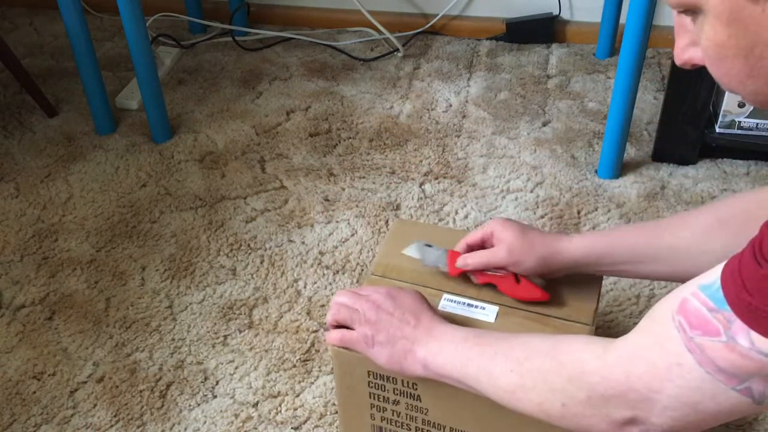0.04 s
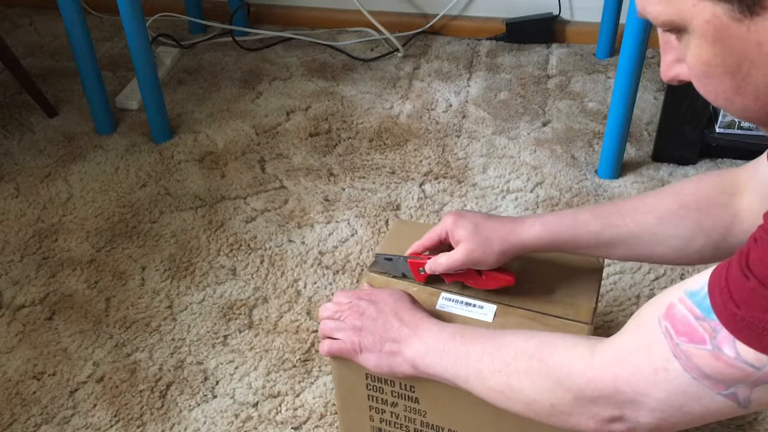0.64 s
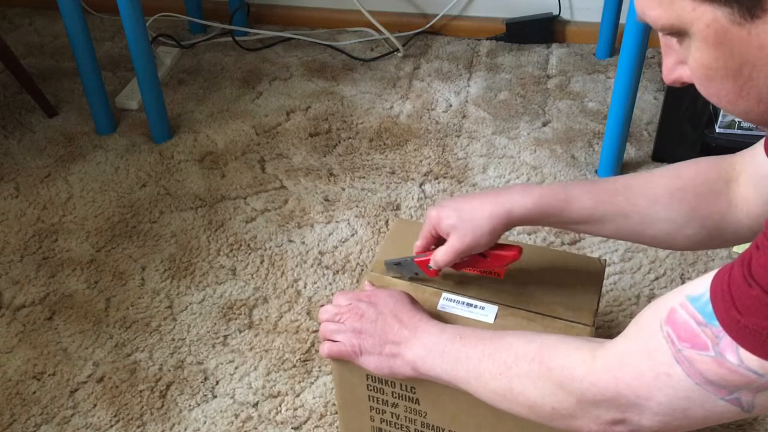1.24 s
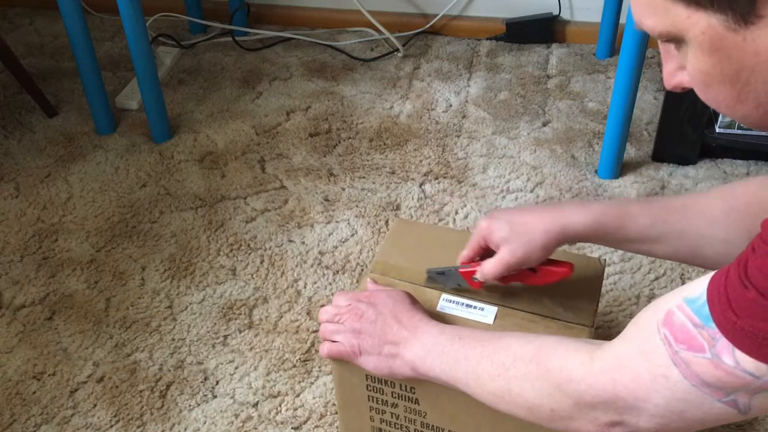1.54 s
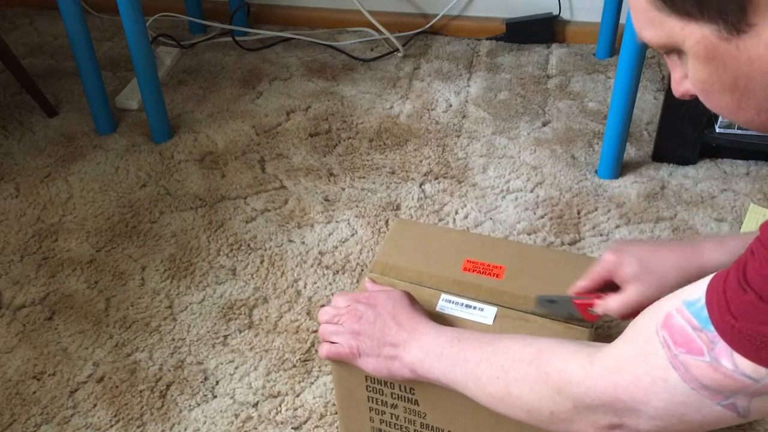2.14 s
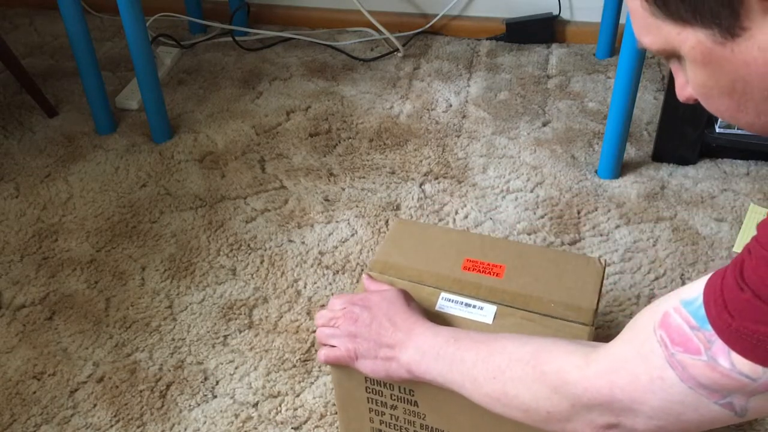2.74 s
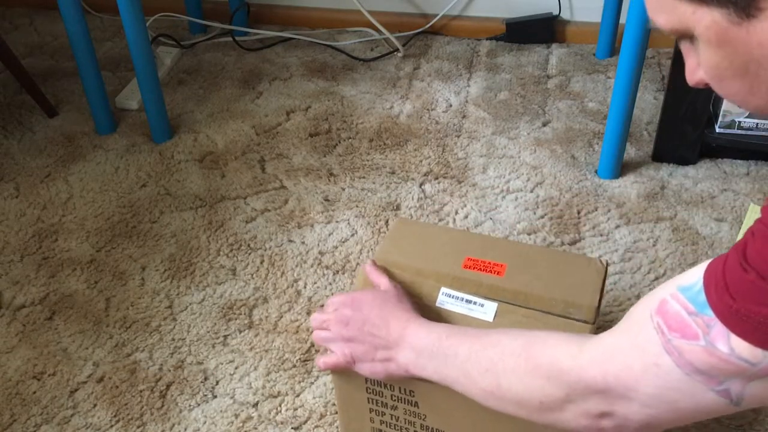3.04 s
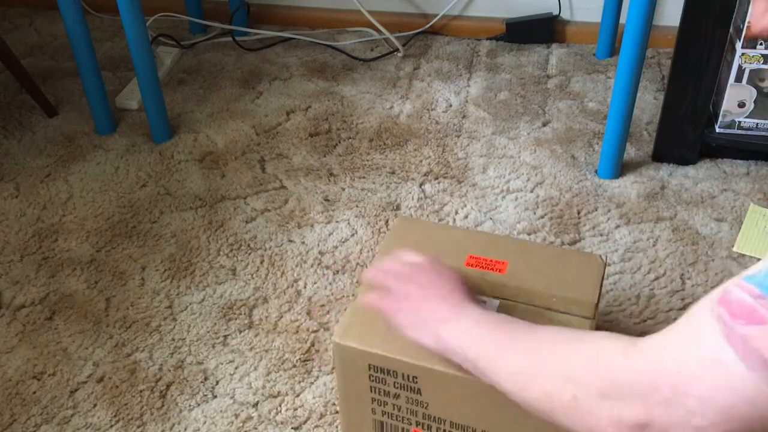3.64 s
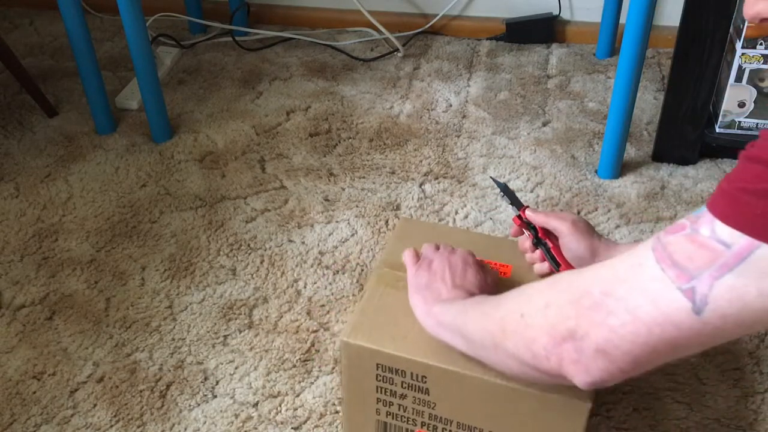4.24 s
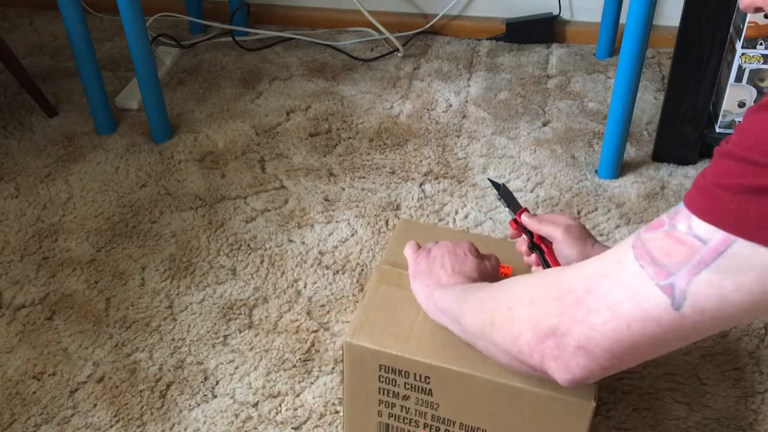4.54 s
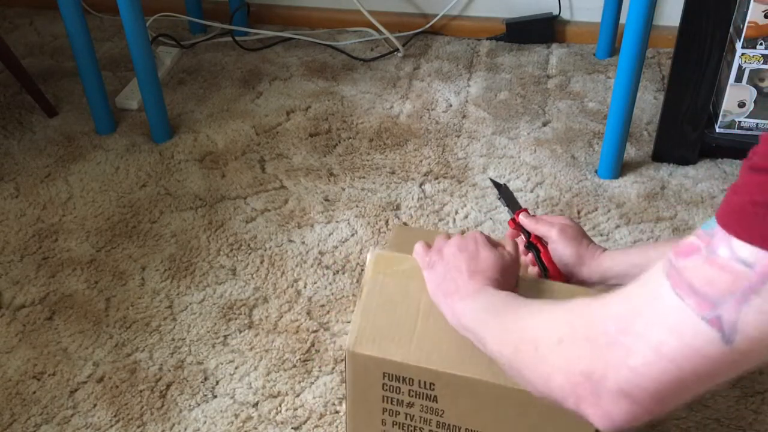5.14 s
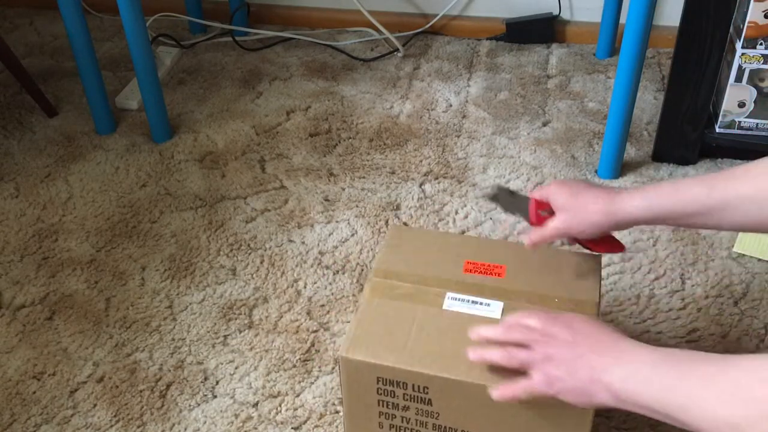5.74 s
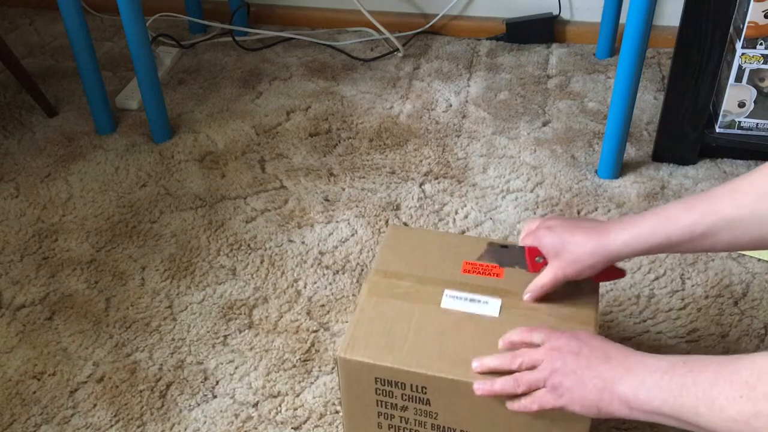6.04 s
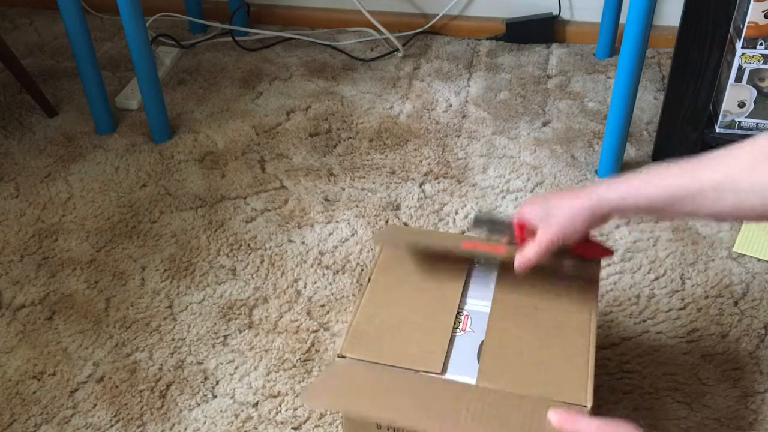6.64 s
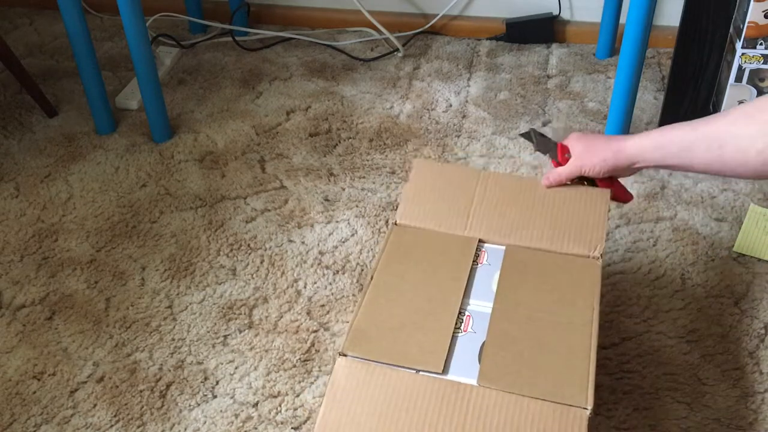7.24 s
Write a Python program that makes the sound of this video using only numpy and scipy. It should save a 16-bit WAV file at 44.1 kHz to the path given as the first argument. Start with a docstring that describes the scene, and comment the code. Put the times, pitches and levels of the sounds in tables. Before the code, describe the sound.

A cardboard box is opened nearby in a small room with short reverberation and faint, low room air. In the first half second, hands and a utility knife scuff and bump the box lightly. From about 1.2 to 2.3 seconds the blade slits the packing tape with a gritty, ticking scrape while the panels creak dully. A few knocks and scuffs follow, and at 2.9 seconds a strand of tape parts with a loud, sharp snap. Hands keep rubbing and pressing the cardboard, with small clicks, a crack at 4.4 seconds and a hollow bump at 4.7. At 5 seconds the last tape tears with a second loud snap and a thump of the box. Soft rubbing and light taps follow. From about 6.2 seconds the flaps scrape past each other and fold open, ending with a hollow tap and a crease crack near 7.2 seconds.

```python
"""A utility knife slits the packing tape of a cardboard box on carpet in a small room.
Friction grits along the blade and rasps in the board; hands rub and bump the panels, which ring.
The last strands of tape part with two loud snaps, then the flaps scrape past each other and fold open.
Near echoes, short reverberation and quiet room air lie behind."""
import sys
import numpy as np
from scipy import signal
from scipy.fft import rfft, irfft
from scipy.io import wavfile

SR = 44100
rng = np.random.default_rng(int(sys.argv[2]) if len(sys.argv) > 2 else 0)


def bounce(signal):
    """Save signal as a 16-bit WAV file at the path given by the first command-line argument."""
    frames = np.transpose(np.atleast_2d(signal))
    limited = np.clip(frames, -1, 1)
    pcm = np.round(limited * 32767).astype(np.int16)
    wavfile.write(sys.argv[1], SR, pcm)


N = 321299

# Blade sawing through tape and liner. Each row: time in seconds, grit level in dB.
BLADE_GRIT = [(1.191, -100), (1.218, -60), (1.38, -76), (1.48, -68), (1.73, -74.5), (1.83, -62),
              (1.94, -73), (2.12, -82), (2.3, -100)]
# Colour of the board's surface. Each row: frequency in Hz, gain in dB.
CARDBOARD_EQ = [(100, -6.5), (400, 8), (650, 8), (850, 1.5), (1200, 2.5), (1500, 2), (2000, 0.5),
                (2800, -2), (3500, -4), (4100, -0.5), (4900, -7.5), (6200, -2), (10500, -2), (16000, -1)]


def cutting_and_rubbing():
    """Friction grits along the blade, shakes the panels, rasps in the board and hisses on its surface."""
    # Knife, hand and flap strokes. Each row: start and length in seconds, rumble, rasp and hiss in dB.
    strokes = [(-0.02, 0.15, -70.5, -70, -63), (0.168, 0.22, -68, -71.5, -72.5),
               (0.48, 0.067, -72.5, -75, -85.5), (1.19, .11, -61.5, -78, -70),
               (1.356, 0.43, -67.5, -79.5, -77.5), (1.744, .36, -61.5, -75.5, -78),
               (2.13, .23, -74, -80, -82), (2.363, 0.11, -59, -69.5, -67), (2.571, 0.48, -66.5, -73, -74.5),
               (3.087, 0.49, -67.5, -71.5, -70.5), (3.614, 0.39, -76.5, -75, -82),
               (3.966, 0.75, -69, -73.5, -73), (4.781, 0.11, -59, -65, -66.5),
               (4.944, 0.082, -53.5, -58.5, -61.5), (5.167, 0.49, -69, -73, -71.5),
               (6.023, 0.22, -67, -78, -76.5), (6.214, 0.34, -69, -66, -63.5), (6.6, 0.36, -75, -78.5, -69),
               (6.767, 0.21, -67.5, -63, -60), (7.018, 0.25, -71, -71.5, -74)]
    # Friction spectra. Each row: frequency in Hz, relative density in dB.
    rumble_eq = [(60, -28), (130, -18), (200, 2), (280, 0), (370, -3.5), (520, -18.5), (900, -27.5),
                 (2000, -56)]
    rasp_eq = [(250, -24), (500, -2), (700, -1.5), (950, -1.5), (1300, -4), (1900, -3.5), (2600, -5.5),
               (4000, -20), (9000, -33.5)]
    hiss_eq = [(1200, -22), (2300, -7.5), (3200, 0.5), (4300, 3), (5000, 0), (6200, 0), (9000, 1.5),
               (10400, -2.5), (12000, 1), (16000, -7.5)]
    blade_eq = [(900, -27), (1450, -4.5), (1850, 6.5), (2350, -6), (2900, -9), (3400, -10.5), (4400, -0.5),
                (5100, -12), (6800, -9), (10000, -10), (16000, -21)]
    resting_db = (-87.5, -85, -83)  # hands at rest: rumble, rasp, hiss
    power = np.ones(N) * from_db(resting_db)[:, None] ** 2
    for start_s, length_s, *levels_db in strokes:
        power += from_db(levels_db)[:, None] ** 2 * stroke_gain(start_s, length_s) ** 2
    rumble, rasp, hiss = np.sqrt(power)
    grit = from_db(np.interp(np.arange(N) / SR, *np.transpose(BLADE_GRIT)))
    return (rumble * friction(rumble_eq, grain_db=3, catch_db=0.5, catches_per_s=30)
            + rasp * friction(rasp_eq, grain_db=2.5, catch_db=3, catches_per_s=150)
            + hiss * friction(hiss_eq, grain_db=2.5, catch_db=2.5, catches_per_s=340)
            + grit * friction(blade_eq, grain_db=4, catch_db=7.5, catches_per_s=210))


def friction(spectrum, grain_db, catch_db, catches_per_s):
    """Countless tiny slips of uneven size, bunched where the surface catches."""
    sizes = from_db(grain_db * np.minimum(rng.exponential(1, N), 7))
    slips = rng.standard_normal(N) * sizes * from_db(catch_db * drift(catches_per_s))
    return rms_one(colour(slips, spectrum))


def stroke_gain(start_s, length_s, attack_s=0.016, sag_db_per_s=1, release_s=0.065):
    """A stroke starts quickly, eases off and dies away."""
    age_s = np.arange(N) / SR - start_s
    attack = np.clip(age_s / attack_s, 0, 1)
    sag = from_db(-sag_db_per_s * np.clip(age_s, 0, length_s))
    release = np.exp(-np.maximum(age_s - length_s, 0) / release_s)
    return attack * sag * release


def blade_catches(count=30, over_grit_db=14, scatter_db=2, centre_hz=3600):
    """Fibres catch on the blade at random, as hard as it bites. Returns rows for tick()."""
    cut_s, grit_db = np.transpose(BLADE_GRIT)
    times_s = cut_s[0] + (cut_s[-1] - cut_s[0]) * (np.arange(count) + rng.random(count)) / count
    levels_db = np.interp(times_s, cut_s, grit_db) + over_grit_db + scatter_db * rng.standard_normal(count)
    return [(start_s, db, centre_hz) for start_s, db in zip(times_s, levels_db)]


def tape_snaps(half_pop_s=0.004):
    """Taut tape tears, the freed flap whips the air for one cycle, and the box recoils on the floor."""
    # Each row: start in seconds, gain in dB, swell in seconds, centre in Hz.
    tears = [(2.9053, -13.5, 0.0002, 8640), (2.9064, -11.5, 0.0007, 2480), (2.909, -21, 0.0009, 1240),
             (2.911, -25.5, 0.0011, 9000), (5.004, -36.5, .0008, 6000), (5.0169, -22, 0.0029, 3476),
             (5.0265, -11, 0.00022, 6500), (5.0312, -27.5, 0.0034, 5520), (5.046, -11, 0.00082, 5490),
             (5.0472, -15, 0.0011, 1870), (5.048, -20, 0.0012, 1250)]
    # Each row: midpoint in seconds, peak in dB, frequency in Hz.
    pops = [(2.9064, -9, 2500), (5.0495, -24.5, 1500), (5.0482, -20.5, 507)]
    # Each row: start in seconds, panel peak in dB, panel centre in Hz, floor thud gain in dB.
    recoils = [(2.9088, -19, 325, -47.5), (5.0196, -31, 426, -49.5), (5.0477, -18.5, 424, -41)]
    # Each row: frequency in Hz, gain in dB, T60 in seconds.
    thud_modes = [(65.7, -6, 1), (81, 9, 0.18), (90, 0, 0.38)]
    fibres, body, floor = np.zeros((3, N))
    for start_s, db, swell_s, hz in tears:
        add(fibres, start_s, from_db(db) * burst(swell_s, hz, spread=1.46, crest_db=5, grain_db=-1))
    for mid_s, db, hz in pops:
        phase = 2 * np.pi * hz * np.arange(-half_pop_s, half_pop_s, 1 / SR)
        add(body, mid_s - half_pop_s, from_db(db) * phase * np.exp((1 - phase ** 2) / 2))
    for start_s, db, hz, thud_db in recoils:
        add(body, start_s, from_db(db) * knock(hz, vary_db=1.9, focus_db=13.5, detune=0.0041, rise_s=0.0017))
        add(floor, start_s, from_db(thud_db) * ring(signal.unit_impulse(SR), thud_modes))
    return colour(fibres, CARDBOARD_EQ) + body + butterworth(floor, 60, "high")


def burst(swell_s, centre_hz, spread, crest_db, grain_db, ease=0.96):
    """A clump of uneven fibre breaks: band noise that swells and dies."""
    age = np.arange(SR // 4) / SR / swell_s
    envelope = (age * np.exp(1 - age)) ** ease
    edges_hz = np.clip([centre_hz / spread, centre_hz * spread], [50, 100], [12000, 19000])
    breaks = rng.standard_normal(len(age)) * from_db(grain_db * rng.standard_normal(len(age)))
    fibres = butterworth(breaks * envelope + 1e-18, edges_hz, "band")
    return from_db(-crest_db) * rms_one(fibres) * np.sqrt(np.mean(envelope ** 2))


def handling(knock_tick_hz=2650):
    """Knife and hands bump, load and scuff the box; loose flaps tap; fibres and creases crack."""
    # Each row: start in seconds, panel gain in dB, panel centre in Hz, tap gain in dB,
    # tap centre in Hz, tick gain in dB.
    bumps = [(.133, -45, 269, -43.5, 950, -54), (0.173, -42, 198, -37, 710, -33),
             (0.3401, -41, 221, -39, 800, -34), (.516, -59.5, 266, -61, 900, -56),
             (1.2234, -47, 189, -42.5, 634, -44), (2.44, -41, 191, -44, 700, -56),
             (2.6064, -50, 260, -47, 880, -30), (2.6604, -40, 248, -37.5, 890, -27.5),
             (3.4679, -53.5, 323, -55, 900, -40), (4.719, -31, 278, -39.5, 595, -62),
             (6.1895, -43.5, 374, -42.5, 620, -41.5), (6.519, -48, 226, -62, 890, -29),
             (6.68, -53.5, 366, -46.5, 1280, -55)]
    # Each row of these three: start in seconds, gain in dB, centre in Hz.
    groans = [(0.345, -48, 228), (1.544, -48.5, 246), (1.755, -42.5, 261.5), (1.799, -39, 240),
              (1.867, -39, 246), (2.269, -53.5, 265), (2.373, -45, 227), (2.686, -35.5, 215),
              (3.814, -47, 261), (4.018, -50.5, 345), (4.368, -40, 268), (4.381, -35.5, 264),
              (4.638, -45.5, 268), (4.807, -45.5, 268), (4.884, -48, 226), (5.652, -52, 288),
              (7.165, -40, 333)]
    flap_taps = [(5.351, -48, 920), (5.428, -48.5, 1120), (5.541, -53, 1120), (5.65, -52, 1012),
                 (6.785, -37.5, 1340), (6.794, -40, 746), (6.943, -40.5, 920), (7.2, -36, 1210)]
    cracks = [(1.326, -38, 4420), (1.835, -41, 2510), (1.8869, -38.5, 6030), (2.404, -36.5, 3150),
              (2.723, -38, 4170), (3.5384, -42, 2480), (4.0007, -40.5, 2180), (4.38, -41, 2110),
              (4.3933, -24, 2500), (4.8055, -38.5, 2660), (4.8833, -37, 1840), (4.9503, -31, 2420),
              (5.4272, -38, 3800), (5.6391, -37.5, 2220), (6.356, -35, 2410), (7.187, -31, 2400)]
    # Each row: start in seconds, gain in dB, swell in seconds, centre in Hz.
    scuffs = [(0.157, -38.5, 0.0098, 4170), (1.795, -48, .016, 900), (1.86, -49, .022, 2200),
              (2.603, -45, 0.015, 4450), (2.67, -47, .025, 4400), (3.261, -45.5, 0.016, 2130),
              (3.535, -43, .029, 4390), (4.01, -53, .018, 2500), (4.111, -45.5, 0.04, 7700),
              (4.371, -35, 0.013, 2240), (4.627, -37.5, .013, 3430), (4.942, -40.5, 0.019, 5390),
              (6.19, -39.5, 0.019, 3900), (6.295, -47.5, 0.045, 1290), (6.504, -39, 0.0063, 4200),
              (6.777, -39, .024, 920), (6.82, -45.5, 0.051, 700), (7.178, -37, .018, 1800)]
    panels, taps, surface = np.zeros((3, N))
    for start_s, panel_db, panel_hz, tap_db, tap_hz, tick_db in bumps:
        bump = knock(panel_hz, vary_db=2, focus_db=13, detune=0.069, rise_s=0.002)
        add(panels, start_s, from_db(panel_db + 0.5) * bump)
        add(taps, start_s, from_db(tap_db) * tap(tap_hz))
        add(surface, start_s, from_db(tick_db) * tick(knock_tick_hz))
    for start_s, db, hz in groans:
        add(panels, start_s, from_db(db - 1) * groan(hz))
    for start_s, db, hz in flap_taps:
        add(taps, start_s, from_db(db) * tap(hz))
    for start_s, db, hz in cracks + blade_catches():
        add(surface, start_s, from_db(db) * tick(hz))
    for start_s, db, swell_s, hz in scuffs:
        scuff = burst(swell_s, hz, spread=2.09, crest_db=10.5, grain_db=9, ease=3.2)
        add(surface, start_s, from_db(db) * scuff)
    return panels + butterworth(taps, 2200, "low") + colour(surface, CARDBOARD_EQ)


def knock(centre_hz, vary_db, focus_db, detune, rise_s, contact_hz=650):
    """A push on a panel: each spot favours the modes near one pitch, and the grip bends them. Peak 1."""
    # Each row: frequency in Hz, gain in dB, T60 in seconds.
    panel_modes = [(179, 0, 0.069), (217, 1, .09), (260.8, 4, 0.1), (300, -7, 0.026), (363, 5, 0.095),
                   (452, -3.5, 0.06), (561, 3, 0.036), (1150, -8, 0.08)]
    modes = []
    for hz, db, t60_s in panel_modes:
        bent_hz = hz * np.exp(detune * rng.standard_normal())
        octaves_off = abs(np.log2(hz / centre_hz))
        modes.append((bent_hz, db - focus_db * octaves_off + vary_db * rng.standard_normal(), t60_s))
    t = np.arange(SR // 4) / SR
    age = 2 * np.pi * contact_hz * t
    onset = 1 - np.exp(-(t / rise_s) ** 2)
    motion = ring(age * np.exp(-age), modes) * onset
    sound = butterworth(motion, 130, "high")  # a small panel radiates little bass
    return sound / np.abs(sound).max()


def groan(hz, count=3, gap_s=0.024, loss_db=11, pitch_ratio=1.3):
    """A panel gives in a run of slips, each weaker and higher as it stiffens."""
    out = np.zeros(SR // 2)
    for k in range(count):
        slip = knock(hz * pitch_ratio ** k, vary_db=3, focus_db=13.5, detune=0.037, rise_s=0.0046)
        add(out, k * gap_s * rng.uniform(0.96, 1.2), from_db(-k * loss_db) * slip)
    return out


def tap(hz, swell_s=0.0011):
    """A hollow tap on the board."""
    return burst(swell_s, hz, spread=1.14, crest_db=4.5, grain_db=1)


def tick(hz, swell_s=0.00093):
    """A few surface fibres crack at once."""
    return burst(swell_s, hz, spread=2.5, crest_db=10, grain_db=3)


def flap_stop(stop_s=7.187):
    """The opened flap rings briefly when its crease stops it."""
    # Each row: frequency in Hz, level in dB, T60 in seconds.
    flap_modes = [(601, -47.5, 0.19), (1210, -48, 0.27), (1360, -53.5, 0.3)]
    out = np.zeros(N)
    add(out, stop_s, ring(signal.unit_impulse(SR // 2), flap_modes))
    return out


def dry_clicks(swell_s=0.0002):
    """Tiny high clicks, too slight to stir the room."""
    # Each row: start in seconds, gain in dB, centre in Hz.
    clicks = [(3.142, -29.5, 9600), (3.9649, -41, 5760), (3.9776, -48, 9050), (4.0023, -41.5, 9040),
              (4.087, -45, 6630), (4.7045, -44, 6000)]
    out = np.zeros(N)
    for start_s, db, hz in clicks:
        add(out, start_s, from_db(db) * burst(swell_s, hz, spread=1.5, crest_db=7.5, grain_db=1.5))
    return butterworth(out, 5000, "high")


def near_echoes(x, gain_db=-5.5, fade_s=0.022, patterns=6, echo_count=40):
    """Walls and furniture echo the box; the pattern changes as hands and body move."""
    out = np.zeros(N)
    for stretch in np.array_split(np.arange(N), patterns):
        delays_s = rng.uniform(0.003, 0.06, echo_count)
        echoes = np.zeros(SR // 10)
        echoes[(delays_s * SR).astype(int)] = np.exp(-delays_s / fade_s) * rng.choice([-1, 1], echo_count)
        add(out, stretch[0] / SR, signal.fftconvolve(x[stretch], echoes / np.linalg.norm(echoes)))
    return from_db(gain_db) * butterworth(out, [350, 8000], "band", order=1)


def reverberation(x, delay_s=0.009, bands=20):
    """The room stores each band's energy and lets it die away as noise."""
    # Each row: frequency in Hz, T60 in seconds, level against the direct sound in dB.
    decay = [(99, 0.42, -9), (294, 0.29, -6), (800, 0.25, -6.5), (2500, 0.29, -6), (5970, 0.29, -8),
             (14400, 0.25, -14.5)]
    edges_hz = np.geomspace(70, 18000, bands + 1)
    white = rng.standard_normal((2, N))
    tail = np.zeros(N)
    for k, band_hz in enumerate(zip(edges_hz, edges_hz[1:])):
        hz = np.sqrt(np.prod(band_hz))
        retained = from_db(-60 / (at_hz(decay, hz) * SR)) ** 2
        energy = signal.lfilter([1 - retained], [1, -retained], butterworth(x, band_hz, "band") ** 2)
        noise = rms_one(butterworth(white[k % 2], band_hz, "band"))
        add(tail, delay_s, from_db(at_hz(decay, hz, column=2)) * np.sqrt(energy) * noise)
    return tail


def room_air(rms_db=-69):
    """Steady, quiet noise, mostly bass."""
    # Each row: frequency in Hz, relative density in dB.
    air_eq = [(15, -46), (25, -14.5), (48, -6), (70, 4), (111, -2.5), (185, -15), (249, -16), (476, -24.5),
              (545, -22), (2910, -37.5), (3820, -29.5), (4870, -39.5), (11300, -42.5), (16000, -42)]
    return from_db(rms_db) * rms_one(colour(rng.standard_normal(N), air_eq))


def from_db(db):
    """Decibels to gain."""
    return 10 ** (np.asarray(db) / 20)


def rms_one(x):
    """Scale to unit rms."""
    return x / np.sqrt(np.mean(x ** 2) + 1e-20)


def at_hz(rows, hz, column=1):
    """Read a table column on a log-frequency axis."""
    rows = np.array(rows)
    return np.interp(np.log(np.maximum(hz, 1)), np.log(rows[:, 0]), rows[:, column])


def add(track, start_s, sound):
    """Mix a sound into a track."""
    start = max(0, round(start_s * SR))
    part = track[start:start + len(sound)]
    part += sound[:len(part)]


def butterworth(x, hz, kind, order=2):
    """Causal low-, high- or band-pass."""
    return signal.sosfilt(signal.butter(order, hz, kind, fs=SR, output="sos"), x)


def colour(x, spectrum, size=4096):
    """Minimum-phase filter with the given spectrum."""
    bins_hz = np.arange(size // 2 + 1) * SR / size
    cepstrum = irfft(np.log(from_db(at_hz(spectrum, bins_hz))))
    cepstrum[1:size // 2] *= 2
    cepstrum[size // 2 + 1:] = 0
    return signal.fftconvolve(x, irfft(np.exp(rfft(cepstrum))))[:len(x)]


def drift(knots_per_s):
    """Linear wander between unit-normal knots."""
    position = np.arange(N) / SR * knots_per_s
    return np.interp(position, np.arange(N // 20), rng.standard_normal(N // 20))


def ring(force, modes):
    """Decaying sines driven by a force."""
    out = np.zeros(len(force))
    for hz, db, t60_s in modes:
        r, w = from_db(-60 / (t60_s * SR)), 2 * np.pi * hz / SR  # pole radius, angle
        out += from_db(db) * signal.lfilter([0, np.sin(w)], [1, -2 * r * np.cos(w), r * r], force + 1e-18)
    return out


def scene():
    """The box in the room, over quiet air; mono."""
    box = cutting_and_rubbing() + handling() + tape_snaps() + flap_stop()
    air = room_air()
    return (box + near_echoes(box) + reverberation(box) + dry_clicks() + air)[None]


def record(dry):
    """Steep low-pass."""
    cutoff_hz = 15900
    return signal.sosfilt(signal.ellip(10, 0.2, 70, cutoff_hz, fs=SR, output="sos"), dry)


dry = scene()
out = record(dry)
bounce(out)
```